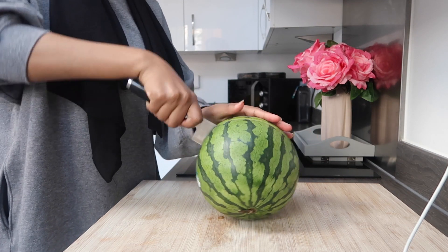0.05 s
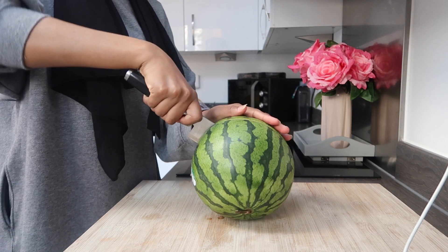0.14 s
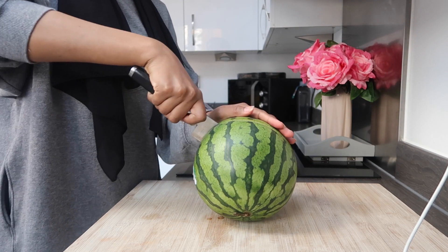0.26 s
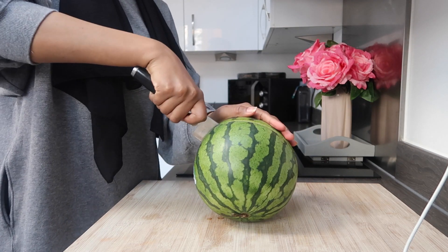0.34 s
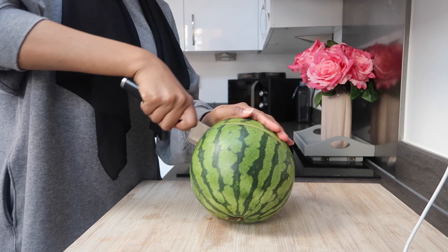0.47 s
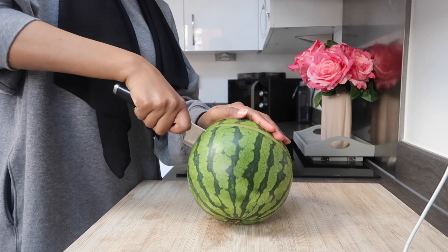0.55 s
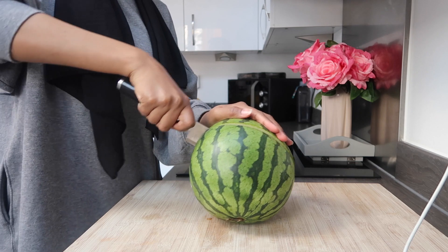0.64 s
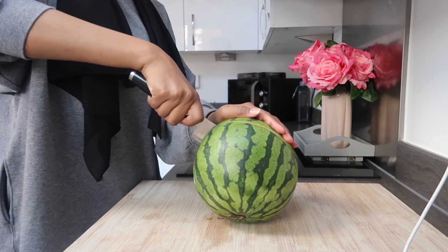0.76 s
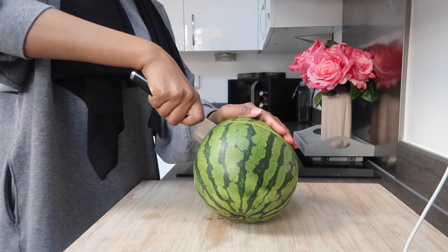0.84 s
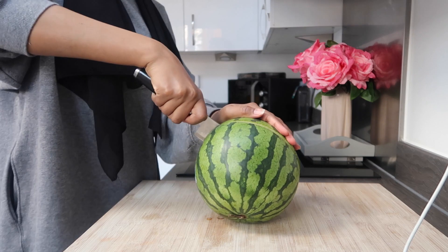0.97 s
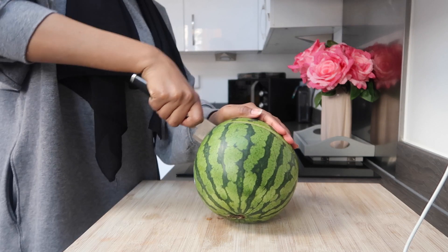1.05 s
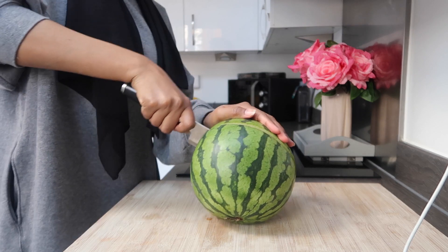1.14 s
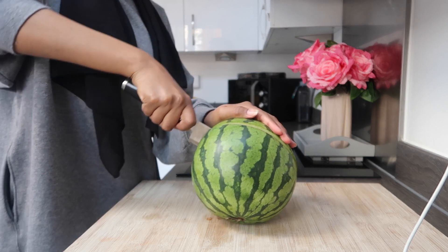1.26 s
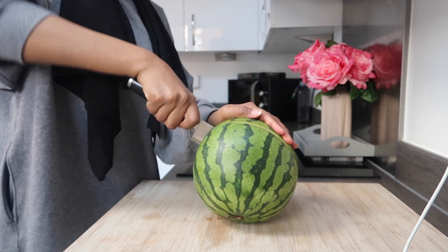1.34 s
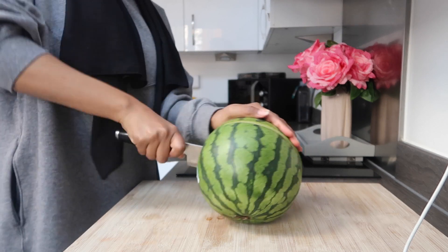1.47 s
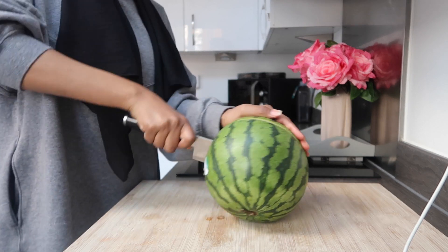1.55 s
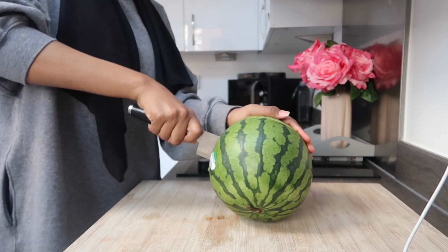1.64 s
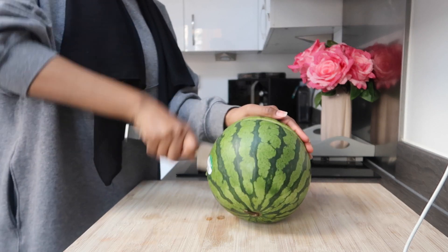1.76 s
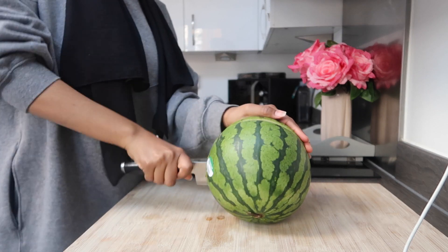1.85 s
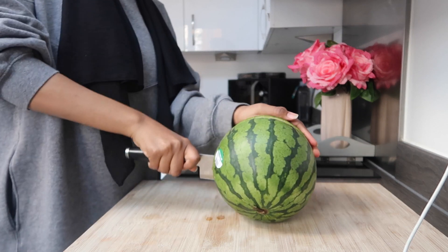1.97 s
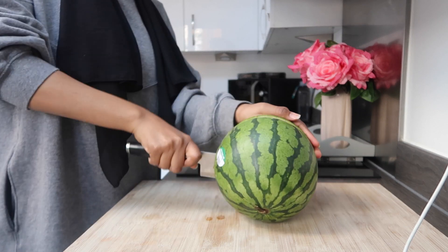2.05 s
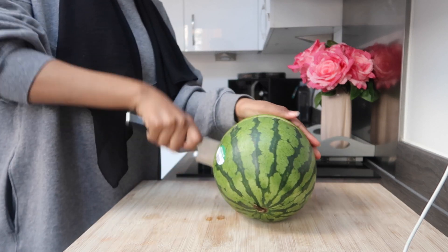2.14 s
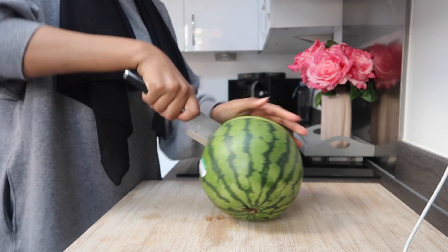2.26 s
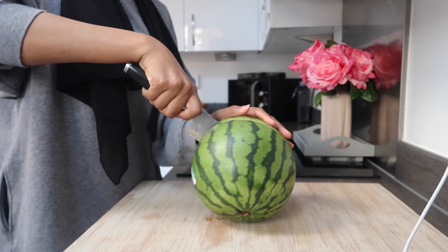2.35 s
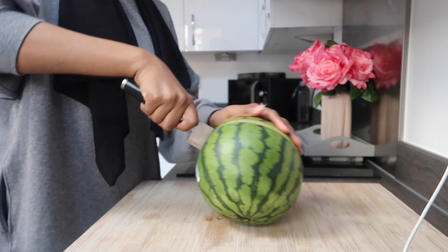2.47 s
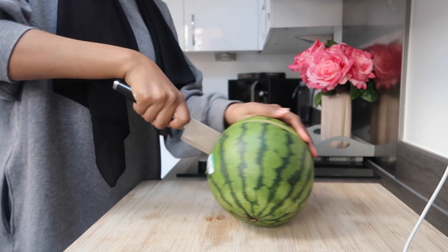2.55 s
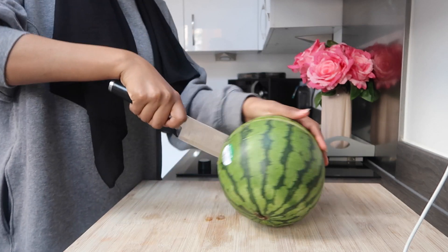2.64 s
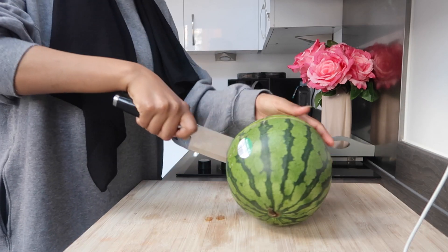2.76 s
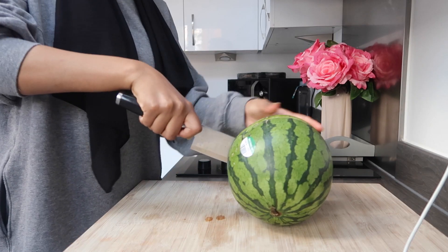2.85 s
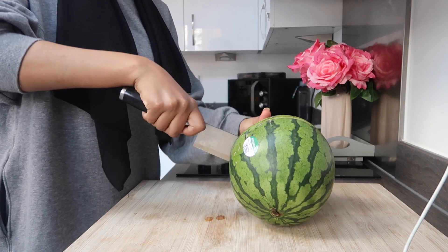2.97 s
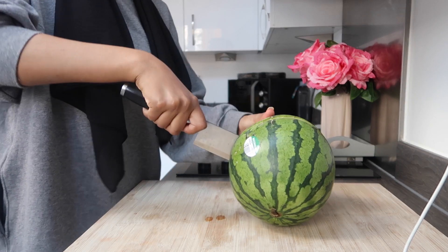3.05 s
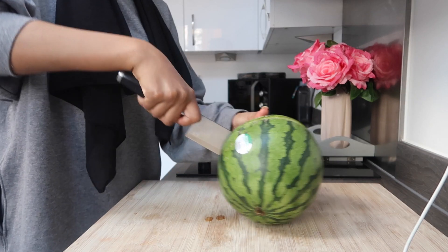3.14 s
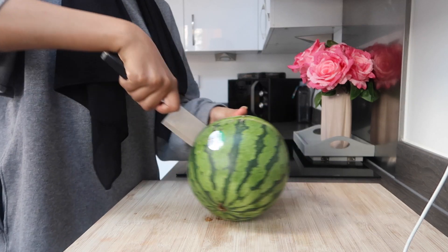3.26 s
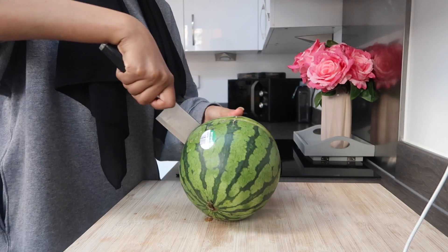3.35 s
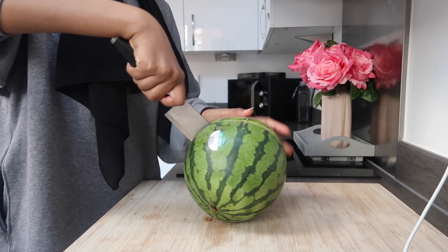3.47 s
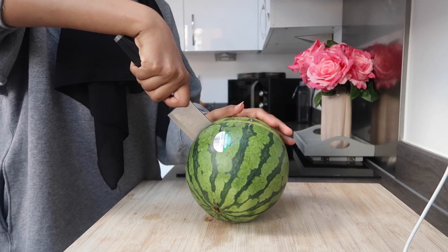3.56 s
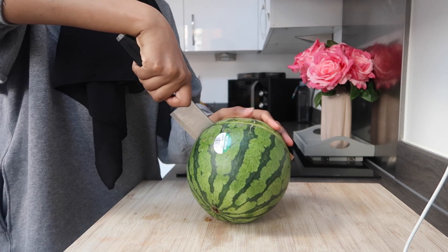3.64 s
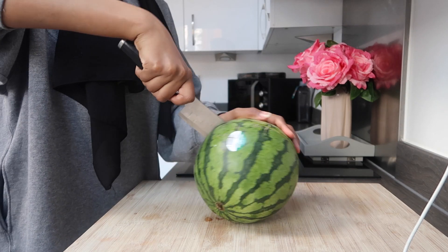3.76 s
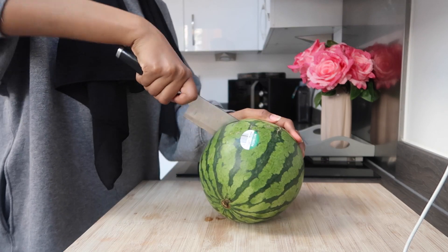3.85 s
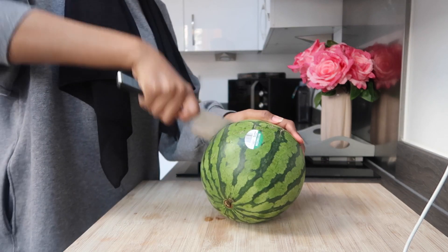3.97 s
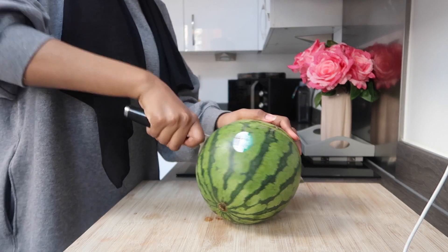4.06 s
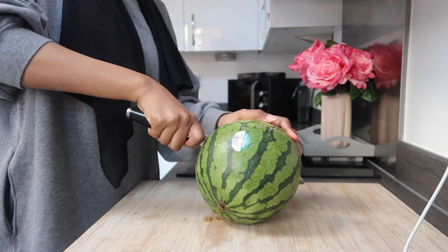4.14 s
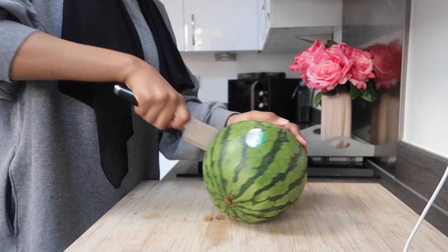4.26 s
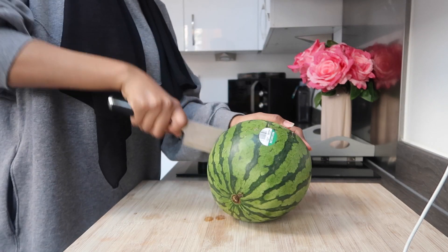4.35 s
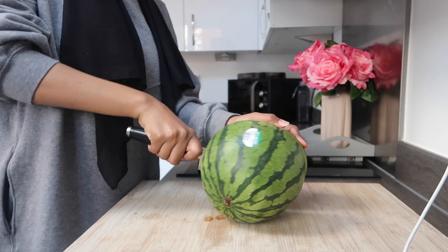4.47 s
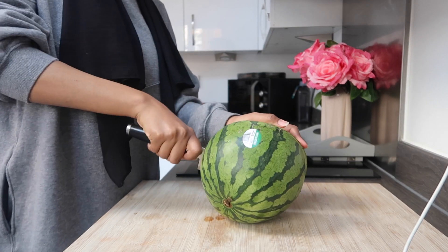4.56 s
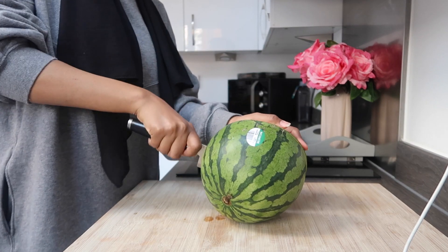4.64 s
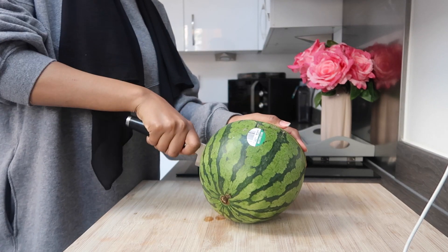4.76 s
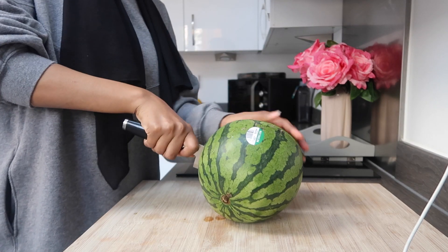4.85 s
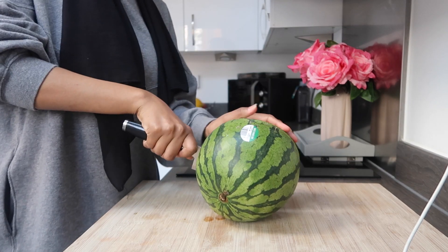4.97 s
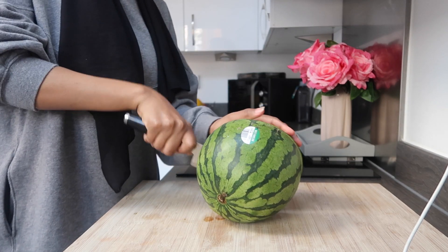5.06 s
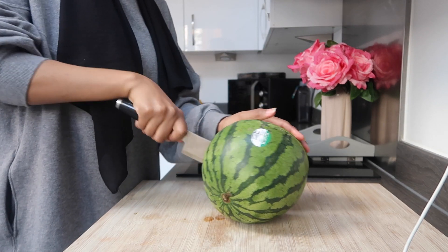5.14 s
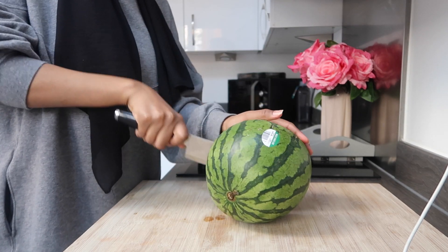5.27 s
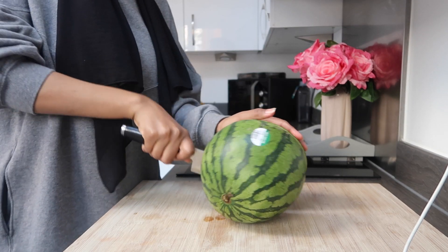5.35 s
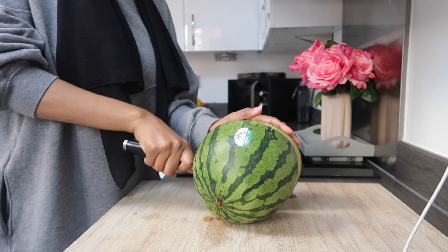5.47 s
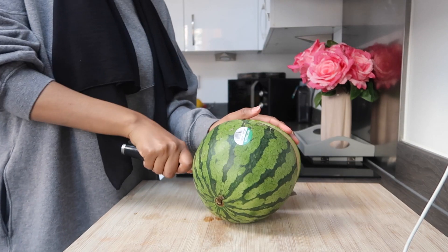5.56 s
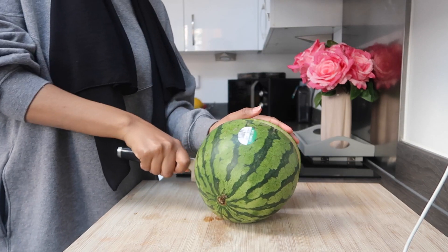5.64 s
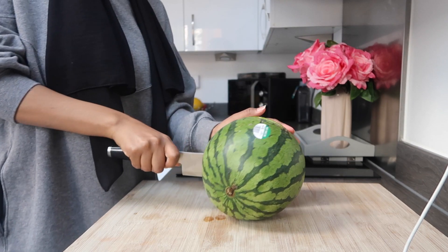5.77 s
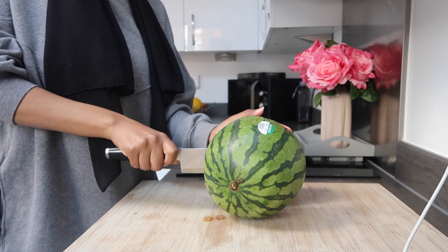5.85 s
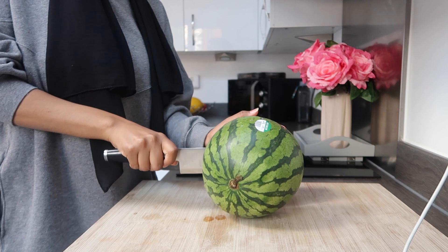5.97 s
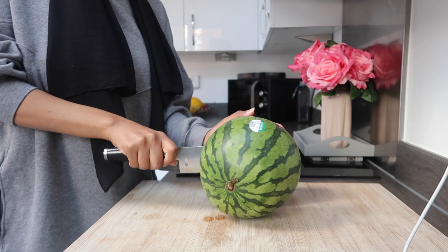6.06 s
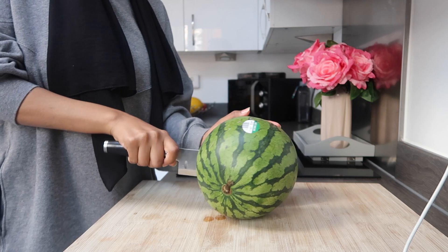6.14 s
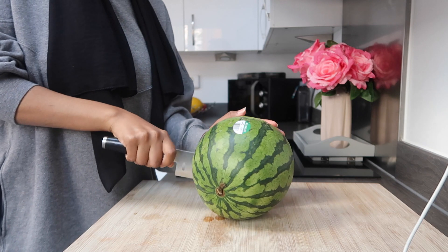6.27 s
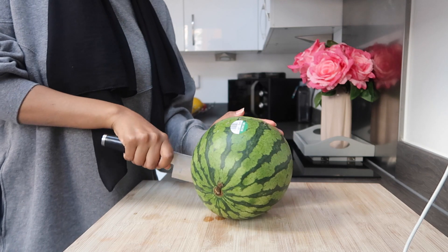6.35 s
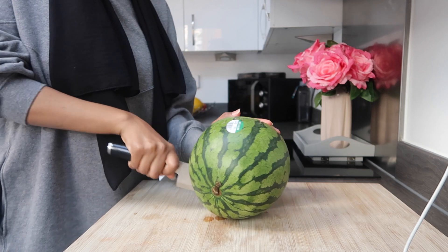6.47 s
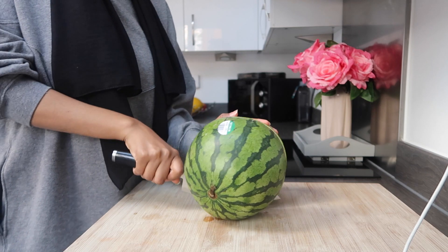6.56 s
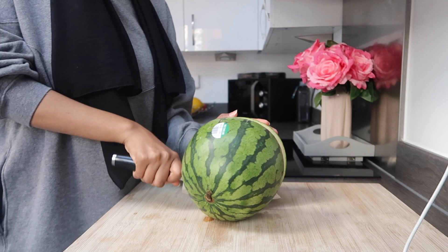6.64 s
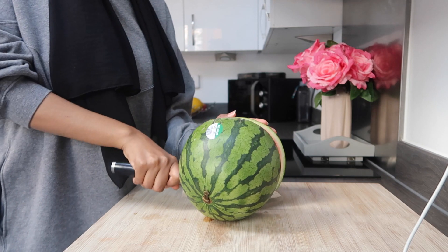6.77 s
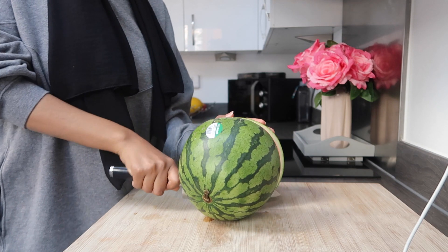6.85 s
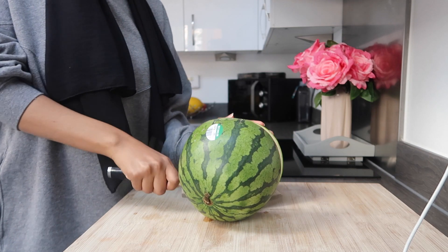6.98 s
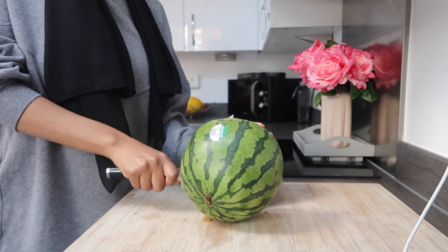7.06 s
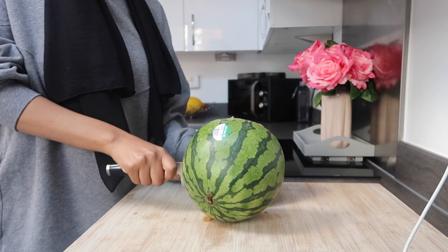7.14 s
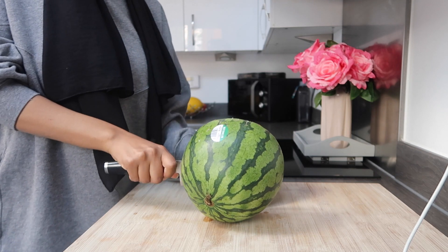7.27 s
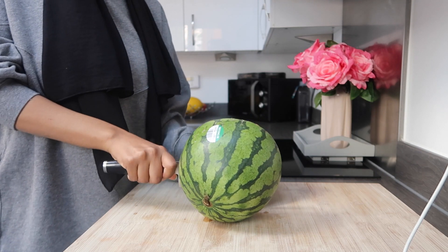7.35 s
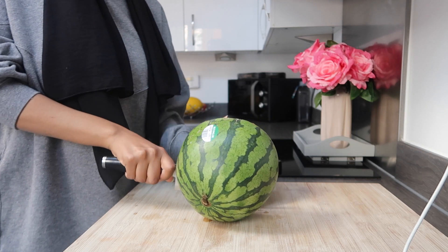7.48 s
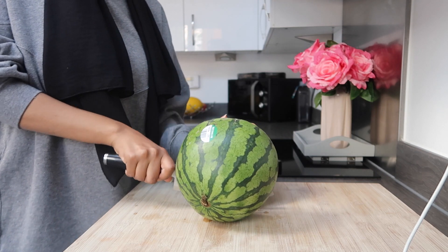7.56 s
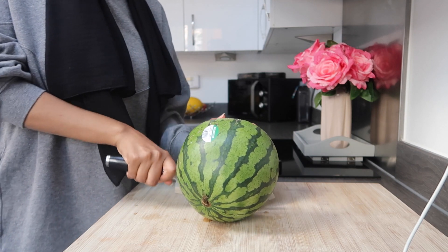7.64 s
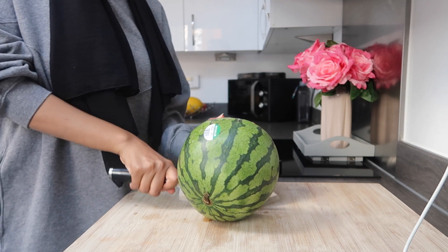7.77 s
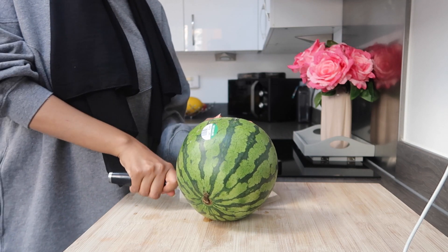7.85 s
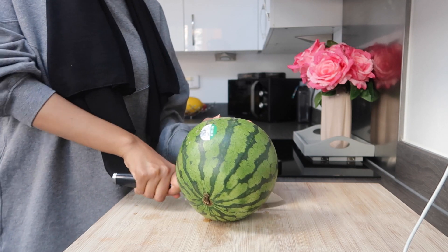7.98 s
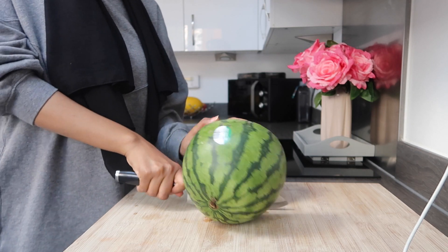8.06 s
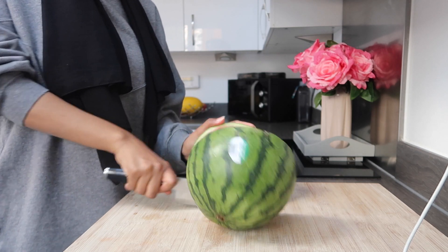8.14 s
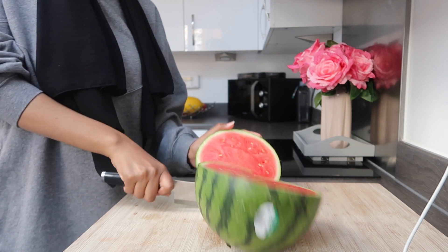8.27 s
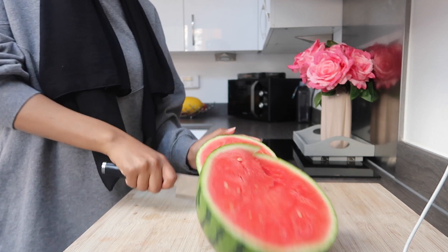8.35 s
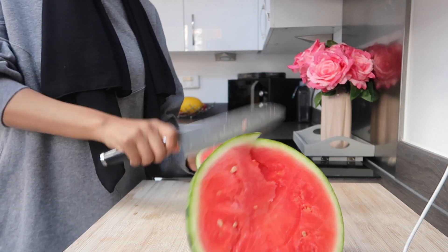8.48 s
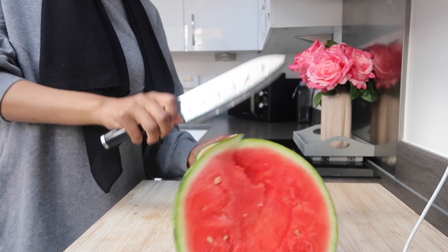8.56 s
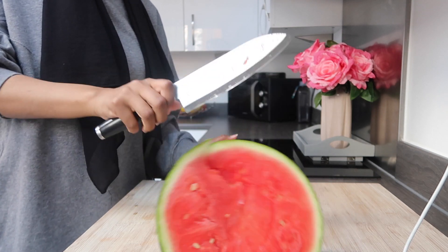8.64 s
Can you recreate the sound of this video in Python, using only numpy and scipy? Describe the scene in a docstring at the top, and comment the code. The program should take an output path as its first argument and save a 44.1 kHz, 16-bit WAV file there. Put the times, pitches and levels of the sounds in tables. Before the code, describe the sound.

A large kitchen knife is pushed through a watermelon on a wooden board. The rind splits in short runs of crisp cracks that knock in the hollow fruit. Between pushes the wet blade slides and squeaks faintly and the melon rocks with dull thuds. Finally the blade slams onto the board and the halves peel wetly apart. The sound is close, in a small, slightly echoing kitchen with a faint appliance hum.

```python
"""A large kitchen knife saws through a watermelon on a wooden board in a small kitchen.
Hard pushes split the rind in runs of cracks that knock in the hollow of the fruit; between pushes
the wet blade slides and squeaks and the melon rocks. The last strip of rind gives, the blade slams
onto the board, an automatic gain control ducks the level and the halves peel apart.
Tiles and cupboards echo, and an appliance hums underneath."""
import sys
import numpy as np
from scipy import signal
from scipy.fft import rfft, irfft, next_fast_len
from scipy.io import wavfile
from scipy.ndimage import uniform_filter1d

SR = 44100
rng = np.random.default_rng(int(sys.argv[2]) if len(sys.argv) > 2 else 0)


def generate_wav(sig):
    """Save sig (samples, or channels by samples) to the path in sys.argv[1] as 16-bit PCM at SR."""
    pcm = np.round(np.clip(np.atleast_2d(sig).T, -1, 1) * 32767).astype(np.int16)
    wavfile.write(sys.argv[1], SR, pcm)


N = 384111
TIME = np.arange(N) / SR
FFT_SIZE = 2 * next_fast_len(N // 2 + SR // 2)
FREQS = np.maximum(np.arange(FFT_SIZE // 2 + 1) * SR / FFT_SIZE, 1)

# hard pushes of the knife: start_s, length_s, tear_db, thud_db, rock_db
PUSHES = [(1.531,0.051,-28,-27.5,-34), (1.891,0.053,-31,-36,-35), (4.098,0.086,-31.5,-39,-30.5),
          (4.506,0.072,-29.5,-28.5,-33.5), (5.413,0.13,-35,-35,-41), (6.546,0.1,-36.5,-37,-31.5),
          (6.781,0.018,-36,-39.5,-44.5), (7.767,0.13,-35,-39.5,-40.5), (8.067,.05,-29.5,-33,-48),
          (8.105,0.022,-22,-26,-41)]
PUSH_ATTACK_S = 0.086
# modes of the steel blade, damped by the flesh: pitch_hz, level_db, t60_s
STEEL_MODES = [(1319, -4, 0.036), (1560, -10.5, 0.02), (2156, -3.5, 0.031), (2423, 0.5, 0.015),
               (3190, -15, 0.022), (3740, -17, 0.025)]
# modes of the whole fruit bouncing: pitch_hz, level_db, t60_s
BOUNCE_MODES = [(111.6, 5.5, 0.036), (138.2, 6.5, 0.034), (194.6, -9, 0.11)]


def rind():
    """Cracks snap in the rind, spray juice, jolt the blade, knock in the hollow fruit and shake it."""
    # the rind splits: start_s, snap_db, hollow_db
    cracks = [(1.2031,-30.5,-45), (1.493,-36,-54.5), (1.515,-17.5,-27.5), (1.524,-12,-22.5),
              (1.532,-17,-30), (1.5435,-18.5,-16.5), (1.5528,-14,-18), (1.565,-26.5,-35),
              (1.5773,-24,-27.5), (1.587,-26.5,-27.5), (1.87,-24,-52), (1.884,-17,-33), (1.8939,-17.5,-31),
              (1.9047,-15.5,-19), (1.913,-16,-20.5), (1.9228,-24,-18), (1.934,-25.5,-18.5),
              (4.067,-29.5,-45), (4.0824,-17.5,-37), (4.093,-20.5,-30), (4.108,-31,-40), (4.1128,-15.5,-32),
              (4.117,-18,-42), (4.133,-16,-31.5), (4.143,-18,-35), (4.1589,-13,-27.5), (4.186,-17.5,-37.5),
              (4.4736,-14.5,-29), (4.4857,-22.5,-33), (4.5051,-13,-29), (4.519,-19,-28.5), (4.528,-22,-35),
              (4.5385,-17.5,-30), (4.549,-19,-33), (4.576,-23.5,-38), (5.392,-17,-36), (5.4067,-21.5,-55),
              (5.43,-15.5,-59), (5.438,-19,-36), (5.448,-20.5,-52), (5.4684,-16,-41), (5.554,-21,-47),
              (6.557,-32,-59), (6.5901,-29.5,-59), (6.642,-33.5,-55), (6.655,-34.5,-52), (6.746,-30,-44),
              (6.755,-35,-53), (6.795,-30,-44), (6.812,-33,-48), (6.824,-33,-49), (8.11,-28,-50.5),
              (8.1306,-31,-24.5)]
    # the outer rind breaks hardest: time_s, first_break_ratio
    hardness = [(1.9, 2.4), (4.1, 1.45)]
    # deeper cracks spray more juice: time_s, fizz_over_snap_db
    juiciness = [(1.55, -21.5), (1.9, -20.5), (4.1, -16.5), (4.5, -20.5), (5.4, -16), (6.7, -13), (8.1, 8)]
    # juice spits out of a crack: start_s, level_db
    juice_spits = [(4.472,-37), (4.487,-33), (5.469,-42), (6.589,-37), (6.754,-46), (6.797,-38)]
    # tone of the woody snap, the bright fizz and the thin spit: freq_hz, level_db
    snap_eq = [(400, -22), (1050, -6), (1350, 2.5), (1750, -3.5), (2150, 2), (2500, 3), (2900, -0.5),
               (3300, -2), (4000, -3.5), (5200, -13.5), (6500, -30.5), (10000, -19.5), (15000, -48.5)]
    fizz_eq = [(1500, -20), (4500, 7.5), (7000, 6.5), (9000, 1), (12000, -11), (15000, -32.5)]
    spit_eq = [(4000, -40), (8000, -2), (12000, 2), (15000, -18)]
    # modes of the melon on its board: pitch_hz, level_db, t60_s
    hollow_modes = [(179.4, -4.5, 0.031), (338, -10, 0.062), (432, -7.5, 0.073), (545, -11, 0.056),
                    (654.5, 0, 0.041), (797, 0.5, 0.029)]
    start_s, snap_db, hollow_db = np.transpose(cracks)
    first_break = np.interp(start_s, *np.transpose(hardness))
    fizz_db = snap_db + np.interp(start_s, *np.transpose(juiciness))
    breaks = fractures(start_s, snap_db, first_break, run_s=0.0021, tail_db=-8, tail_s=0.012)
    fizz = fractures(start_s, fizz_db, first_break=0.13, run_s=0.0037, tail_db=-4, tail_s=0.012)
    spits = fractures(*np.transpose(juice_spits), first_break=0.5, run_s=0.0025, tail_db=-5, tail_s=0.0089)
    snap = bending_chirp(coloured(breaks, snap_eq))
    juice = from_db(1) * coloured(fizz, fizz_eq) + coloured(spits, spit_eq)
    hollow = struck(start_s, hollow_db, hollow_modes, scatter_db=2, detune=0.034)
    steel = struck(start_s, snap_db, STEEL_MODES, scatter_db=7, detune=0.033)
    shudder = struck(start_s, snap_db, BOUNCE_MODES[-1:], scatter_db=-0.5, detune=0.023)
    bite = gripped(from_db(-3.5) * snap + from_db(-11.5) * steel)
    return bite + juice + from_db(3) * hollow + from_db(-18) * shudder


def fractures(starts, levels_db, first_break, run_s, tail_db, tail_s):
    """A crack opens with one sharp break, runs on for a few ms and leaves a dying crackle."""
    t = np.arange(SR // 14) / SR
    out, cells = np.zeros(N), grains(per_s=9000, spread_db=3)
    run = np.exp(-(t / run_s) ** 4)
    for s, gain, hard in zip(starts, from_db(levels_db), np.broadcast_to(first_break, len(starts))):
        here = slice(round(s * SR), round(s * SR) + len(t))
        burst = cells[here] * run
        burst /= np.sqrt(np.sum(burst ** 2)) + 1e-9
        burst[0] -= hard
        burst *= np.sqrt(run_s * SR / (1 + hard ** 2))
        crackle = cells[here] * from_db(tail_db) * np.exp(-t / tail_s)
        out[here] += gain * (burst + crackle)
    return out


def bending_chirp(x):
    """Highs outrun lows in the stiff rind, so each snap is a quick downward chirp."""
    lag_s, corner_hz = 0.002613, 2280
    lag_cycles = lag_s * (corner_hz * np.arctan(FREQS / corner_hz) - FREQS / 5)
    return filtered(x, np.exp(-2j * np.pi * lag_cycles))


def gripped(x):
    """Three broad blade resonances swell and shrink as the flesh's grip changes from stroke to stroke."""
    # boost or cut of each resonance: time_s, low_db, middle_db, high_db
    grip = [(1.2,-11,-2.5,1.5), (1.55,1,2,8), (1.9,2,-4,4), (4.13,-3,2.5,1), (4.52,4,2,4), (5.45,2,1,4),
            (6.7,-2,-1.5,-0.5), (7.8,-12,-1,0)]
    # the resonances: centre_hz, width_hz
    resonances = [(1360, 620), (2420, 530), (3330, 250)]
    time_s, *boosts_db = np.transpose(grip)
    for (hz, width), db in zip(resonances, boosts_db):
        band = signal.lfilter(*signal.iirpeak(hz, hz / width, fs=SR), x)
        x = x + (from_db(np.interp(TIME, time_s, db)) - 1) * band
    return x


def blade():
    """Steel drags through wet cells: a fine rub, clumps of pops, a damped rasp and a sparse crackle."""
    # light slides between pushes: start_s, length_s, level_db
    slides = [(0,0.071,-51), (0.555,0.05,-50.5), (1.161,0.075,-44.5), (2.23,0.068,-54.5),
              (2.413,0.034,-53.5), (2.827,0.071,-54.5), (3.326,0.078,-54.5), (3.821,0.058,-46.5),
              (4.316,0.065,-49.5), (5.042,0.054,-50.5), (5.253,0.027,-52.5), (5.755,0.025,-51.5),
              (6.438,0.012,-47.5), (6.968,0.26,-56.5), (7.617,0.023,-45.5), (7.984,0.044,-53)]
    # tone of steel on wet flesh: freq_hz, level_db
    flesh_eq = [(300, -6.5), (550, -7.5), (900, -3.5), (1100, -2.5), (1400, 1), (1850, -3), (2300, 2.5),
                (2900, -4), (3400, -3.5), (4800, -7.5), (9000, -11), (12000, -31.5), (15000, -33)]
    rest_db = -68.5  # the knife only leans in the cut
    start_s, length_s, tear_db, _, _ = np.transpose(PUSHES)
    pushing = swells(start_s, length_s, tear_db, rest_db, PUSH_ATTACK_S, release_s=0.17)
    sliding = swells(*np.transpose(slides), rest_db, attack_s=0.074, release_s=0.11)
    rub = rms_one(grains(per_s=7000, spread_db=1.9) * from_db(2.95 * drift(160)))
    pops = rms_one(grains(per_s=600, spread_db=1) * from_db(2 * drift(50)))
    flesh = coloured(from_db(-1.5) * rub + from_db(-11) * pops, flesh_eq)
    rasp = rms_one(sum((-1) ** k * from_db(db) * ring(rub, hz, t60_s=0.015)
                       for k, (hz, db, _) in enumerate(STEEL_MODES)))
    crackle = sliding * from_db(-11.5) * coloured(grains(per_s=70, spread_db=2.4), flesh_eq)
    return gripped(np.maximum(pushing, sliding) * (flesh + from_db(-20) * rasp) + crackle)


def board():
    """Knife and fruit knock on the wood: one light tap, then the final slam."""
    # the blows: start_s, level_db
    knocks = [(7.044, -37), (8.134, 3)]
    # modes of the board under the blade: pitch_hz, level_db, t60_s
    wood_modes = [(369, -9, 0.019), (662, 0, 0.033), (853, 0, 0.018), (1067, -0.5, 0.021),
                  (1343, -2.5, 0.03), (1460, 1.5, 0.011), (2000, 2, 0.0047), (3000, -11, 0.002),
                  (4700, -20, 0.0018)]
    return struck(*np.transpose(knocks), wood_modes, scatter_db=0.5, detune=0.0043)


def melon():
    """The heavy fruit thuds and sways on the board when it is pushed or rolled, and bumps down."""
    # the melon tips and rolls: start_s, length_s, level_db
    rolls = [(0.508,0.027,-46), (1.038,0.068,-34.5), (1.195,0.061,-41), (2.253,0.25,-48.5), (3.73,0.16,-48),
             (5.076,0.019,-39.5), (5.3,0.08,-47.5), (8.355,0.036,-33.5), (8.434,0.12,-28.5)]
    # it lands on the board: start_s, level_db
    landings = [(1.054, -27), (4.158, -25), (8.1112, -6.5), (8.1317, -13)]
    # tone of its dull thud: freq_hz, level_db
    thud_eq = [(25, -14), (70, -0.5), (103, 4.5), (140, 4), (170, -3), (197, -4.5), (260, -33.5),
               (2000, -73)]
    push_s, push_length_s, _, thud_db, rock_db = np.transpose(PUSHES)
    roll_s, roll_length_s, roll_db = np.transpose(rolls)
    thud_rest_db, rock_rest_db = -62, -60
    roll_ramps = dict(attack_s=0.055, release_s=0.16)
    push_thud = swells(push_s, push_length_s, thud_db, thud_rest_db, PUSH_ATTACK_S, release_s=0.14)
    roll_thud = swells(roll_s, roll_length_s, roll_db - 7, thud_rest_db, **roll_ramps)
    # after a push its weight sways late and settles slowly
    late_s, hold_s = push_s + 0.04, np.full(len(push_s), 0.033)
    push_rock = swells(late_s, hold_s, rock_db, rock_rest_db, PUSH_ATTACK_S, release_s=0.19)
    roll_rock = swells(roll_s, roll_length_s, roll_db, rock_rest_db, **roll_ramps)
    sway_hz = 35 * np.exp(0.18 * drift(21))
    sway = np.maximum(push_rock, roll_rock) * np.sqrt(2) * np.sin(2 * np.pi * np.cumsum(sway_hz) / SR)
    thud = np.maximum(push_thud, roll_thud) * coloured(rng.standard_normal(N), thud_eq)
    bumps = struck(*np.transpose(landings), BOUNCE_MODES, scatter_db=1.5, detune=0.014)
    return from_db(1.8) * sway + from_db(-4.5) * thud - bumps


def peel():
    """Wet flesh scrapes off the blade as the halves fall open; the widening gap lowers its pitch."""
    # the halves part: time_s, level_db, centre_hz
    parting = [(8.14,-36.5,1708), (8.27,-38.5,1449), (8.33,-46.5,1198), (8.419,-52.5,998), (8.5,-64,755)]
    time_s, db, centre_hz = np.transpose(parting)
    phase = 2 * np.pi * np.cumsum(np.interp(TIME, time_s, centre_hz)) / SR
    rub = signal.sosfilt(signal.butter(1, 450, fs=SR, output="sos"), grains(per_s=2500, spread_db=2.43))
    envelope = from_db(np.interp(TIME, time_s, db)) * (TIME > time_s[0]) * (TIME < time_s[-1])
    return envelope * rms_one(rub * np.cos(phase))


def squeaks():
    """Uneven slips ring a pocket between steel and flesh, and more weakly its overtone."""
    # the wet steel sticks and slips: start_s, length_s, level_db, pitch_hz
    stick_slips = [(1.165,0.054,-45.5,2210), (4.382,0.067,-51,2400), (5.063,.04,-50.5,1400),
                   (5.179,0.038,-51,2350), (6.54,0.053,-38,1720)]
    slips_per_s, out = 260, np.zeros(N)
    for s, length_s, db, hz in stick_slips:
        swell = np.hanning(round(length_s * SR))
        n = len(swell)
        pace = np.exp(0.5 * rng.standard_normal(SR // 10).repeat(40)[:n])
        slip_count = np.floor(np.cumsum(pace) * slips_per_s / SR)
        slips = np.diff(slip_count, prepend=0) * rng.exponential(1, SR // 10)[:n]
        voice = rms_one(ring(slips, hz, t60_s=0.025) + from_db(-2) * ring(slips, 1.5 * hz, t60_s=0.0036))
        out[round(s * SR):round(s * SR) + n] += from_db(db) * np.sqrt(swell) * voice
    return out


def wet_ticks():
    """Pockets of juice pop in the cut, each ringing two short tones."""
    # the pops: start_s, level_db, pitch_hz
    ticks = [(2.764,-45,1910), (2.807,-43,2070), (4.319,-44,3000), (4.842,-38,1420), (5.691,-44.5,2620),
             (5.771,-40.5,1726), (7.043,-41,2410), (7.162,-44,2200)]
    out = np.zeros(N)
    for s, db, hz in ticks:
        click = np.zeros(N)
        click[round(s * SR)] = from_db(db)
        out += ring(click, hz, t60_s=0.029) + ring(click, 1.4 * hz, t60_s=0.012)
    return out


def dry_clicks():
    """Single fibres part as the blade shifts, with a short, bright snap that rings nothing."""
    # the fibres break: start_s, level_db
    fibres = [(2.286,-49), (3.3195,-36), (3.4562,-52), (6.237,-51), (6.4425,-48), (7.135,-48), (8.62,-48)]
    # their tone: freq_hz, level_db
    fibre_eq = [(500,-4), (1700,-1), (4500,-3), (9500,-9.5), (14000,-30)]
    snaps = fractures(*np.transpose(fibres), first_break=0.87, run_s=0.0012, tail_db=-2, tail_s=0.008)
    return coloured(snaps, fibre_eq)


def hand():
    """Hand and sleeve brush softly over the rind as the melon is turned."""
    # the strokes: start_s, length_s, level_db
    brushes = [(3.194,.15,-66), (3.626,0.032,-57), (3.817,0.034,-61)]
    # tone of skin and cloth: freq_hz, level_db
    brush_eq = [(500, -9), (2200, 2), (9000, 4), (15000, -15.5)]
    envelope = swells(*np.transpose(brushes), rest_db=-81.5, attack_s=0.14, release_s=0.082)
    return from_db(2) * envelope * coloured(grains(per_s=1000, spread_db=3.5), brush_eq)


def worktop(x, scatter_db, fade_s):
    """Board, hands and splashback scatter the sound within a few ms, differently to left and right."""
    t = np.arange(SR // 50) / SR
    echoes = rng.standard_normal((2, len(t))) * t * np.exp(-t / fade_s)
    echoes /= np.sqrt(np.sum(echoes ** 2, axis=1, keepdims=True))
    short_waves = FREQS / (FREQS + 4000)  # long waves pass around small things
    return from_db(scatter_db) * filtered(x, rfft(echoes, FFT_SIZE) * short_waves)


def kitchen(x):
    """A dense echo from tiles and cupboards, lingering longest in the bass."""
    # reverb decay (negative in the top band, which returns as a faint slap 0.75 s late): freq_hz, t60_s
    decay = [(100, 1.1), (800, 0.34), (2500, 0.6), (12000, -0.04)]
    # reverb tone: freq_hz, level_db
    reverb_eq = [(100, -26.5), (300, -10), (700, -6.5), (2000, -15), (5000, -17.5), (12000, -26)]
    t = np.arange(SR * 3 // 4) / SR
    onset = np.clip((t - 0.004) / 0.0074, 0, 1)
    edges_hz = np.geomspace(60, 16000, 9)
    tail = np.zeros((2, len(t)))
    for low, high in zip(edges_hz, edges_hz[1:]):
        t60_s = np.interp(np.sqrt(low * high), FREQS, at_hz(decay))
        fade = np.exp(-np.log(1000) * t / t60_s) * onset
        bandpass = signal.butter(2, [low, high], "band", fs=SR, output="sos")
        band = signal.sosfilt(bandpass, rng.standard_normal(tail.shape))
        tail += band * fade / np.sqrt(np.sum(fade ** 2))
    return diffuse(filtered(x, rfft(tail, FFT_SIZE) * from_db(at_hz(reverb_eq))))


def background():
    """Room air, the wavering hum of an appliance and a faint whine that fades at the start."""
    # room tone: freq_hz, level_db
    air_eq = [(35, -2), (70, 0), (102, -9), (160, -11.5), (300, -10.5), (560, -15), (900, -17.5),
              (2200, -22), (4000, -26.5), (12000, -36.5), (15000, -44.5)]
    # tones of the appliance: pitch_hz, level_db
    hum_tones = [(102.3, -55.5), (694.4, -64.5), (791.3, -70.5)]
    air = from_db(-50.5) * diffuse(coloured(rng.standard_normal((2, N)), air_eq))
    hum = sum(wavering(hz, db) for hz, db in hum_tones)
    whine = wavering(hz=1174, db=-67) * np.clip(1 - TIME / 1.8, 0, 1)
    return air + hum + whine


def wavering(hz, db):
    """A tone whose strength and phase wander."""
    phase = 2 * np.pi * hz * TIME
    return from_db(db) * (drift(per_s=20) * np.sin(phase) + drift(per_s=20) * np.cos(phase))


def diffuse(pair):
    """Two unrelated signals become left and right, alike where the microphone ports hear alike."""
    # diffuse sound at the two ports: freq_hz, likeness (0-1)
    likeness = [(60, .999), (130, 0.94), (290, 0.1), (700, 0.6), (2500, 0.28), (7000, 0), (12000, 1)]
    alike = np.clip(at_hz(likeness), 0, 1)
    mid, side = filtered(pair, np.sqrt([(1 + alike) / 2, (1 - alike) / 2]))
    return np.array([mid + side, mid - side])


def struck(starts, levels_db, modes, scatter_db, detune):
    """Every blow rings all modes, each with a strength and a slight detuning of its own."""
    hz, mode_db, t60_s = np.transpose(modes)[:, :, None]
    t, out = np.arange(SR // 6) / SR, np.zeros(N)
    polarity = (-1) ** np.arange(len(modes))[:, None]
    fades = polarity * from_db(mode_db - 60 * t / t60_s)
    variations = rng.standard_normal((len(starts), 2, len(modes), 1))
    for s, gain, (loud, sharp) in zip(starts, from_db(levels_db), variations):
        rings = from_db(scatter_db * loud) * fades * np.sin(2 * np.pi * hz * (1 + detune * sharp) * t)
        out[round(s * SR):round(s * SR) + len(t)] += gain * rings.sum(axis=0)
    return out


def ring(clicks, hz, t60_s):
    """A unit click sets a sine of height 1 ringing."""
    r, w = from_db(-60 / (t60_s * SR)), 2 * np.pi * hz / SR
    return signal.lfilter([0, np.sin(w)], [1, -2 * r * np.cos(w), r * r], clicks + 1e-18)


def grains(per_s, spread_db):
    """Cells bursting at random, many small and a few large; rms 1."""
    sizes = from_db(spread_db * np.minimum(rng.exponential(1, N), 4)) * rng.choice([-1, 1], N)
    return rms_one(sizes * (rng.random(N) < per_s / SR))


def swells(starts, lengths, levels_db, rest_db, attack_s, release_s):
    """Gain of a series of moves: each rises from rest, holds its level and sinks back."""
    above_db = np.zeros(N)
    for s, length, db in zip(starts, lengths, levels_db):
        shape = np.interp(TIME, [s - attack_s, s, s + length, s + length + release_s], [0, 1, 1, 0])
        above_db = np.maximum(above_db, (db - rest_db) * shape)
    return from_db(rest_db + above_db)


def drift(per_s):
    """Smooth random wander with spread 1."""
    knots = rng.standard_normal(int(N / SR * per_s) + 2)
    return rms_one(np.interp(TIME * per_s, np.arange(len(knots)), knots))


def coloured(x, eq):
    """Causal (minimum-phase) EQ that keeps the power of white input."""
    cepstrum = irfft(np.log(rms_one(from_db(at_hz(eq)))))
    cepstrum[1:FFT_SIZE // 2] *= 2
    cepstrum[FFT_SIZE // 2 + 1:] = 0
    return filtered(x, np.exp(rfft(cepstrum)))


def filtered(x, response):
    """Apply a frequency response."""
    return irfft(rfft(x, FFT_SIZE) * response, FFT_SIZE)[..., :N]


def at_hz(points):
    """Read a table on a log-frequency axis."""
    hz, value = np.transpose(points)
    return np.interp(np.log(FREQS), np.log(hz), value)


def from_db(db):
    """Decibels to gain."""
    return 10 ** (np.asarray(db) / 20)


def rms_one(x):
    """Scale to rms 1."""
    return x / np.sqrt(np.mean(x ** 2) + 1e-20)


def gain_control(x, threshold_db, attack_s):
    """A loud blow turns the gain down at once, and it stays down."""
    power = uniform_filter1d(np.mean(x ** 2, axis=0), SR // 250)
    level_db = 10 * np.log10(np.maximum(power, 1e-12))
    cut_db = np.maximum.accumulate(np.maximum(level_db - threshold_db, 0))
    pole = np.exp(-1 / (attack_s * SR))
    return x * from_db(-signal.lfilter([1 - pole], [1, -pole], cut_db))


def scene():
    """The blade is slightly right of centre; treble reaches the two microphone ports out of step."""
    # phase of the left port against the right: freq_hz, lead_rad
    port_phase = [(0, 0), (2500, -.15), (4000, -.65), (5900, -1.6), (8500, -2.6), (11000, -3)]
    cutting = rind() + blade() + squeaks() + wet_ticks() + dry_clicks() + hand() + board() + peel()
    fruit = melon()
    direct = cutting * from_db([[-0.6], [0.6]]) + fruit
    reflections = worktop(cutting, scatter_db=-3, fade_s=0.0027) + kitchen(cutting + fruit)
    lead_rad = np.interp(FREQS, *np.transpose(port_phase))
    return filtered(direct + reflections + background(), np.exp(1j * np.outer([0.5, -0.5], lead_rad)))


def record(dry):
    """Gain control, soft-clipped peaks and a steep high cut."""
    held = np.tanh(gain_control(dry, threshold_db=-5, attack_s=0.0021))
    return signal.sosfilt(signal.ellip(10, 0.1, 80, 15400, fs=SR, output="sos"), held)


dry = scene()
out = record(dry)
generate_wav(out)
```